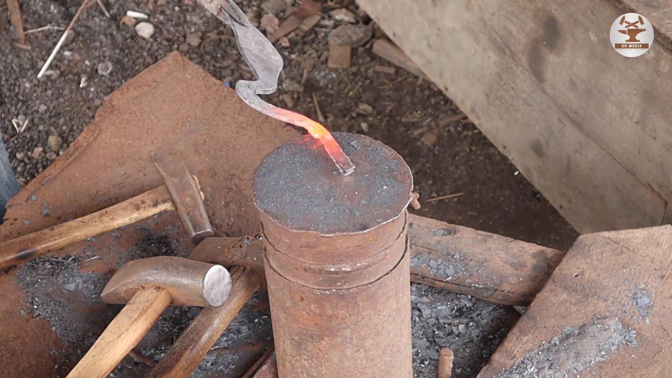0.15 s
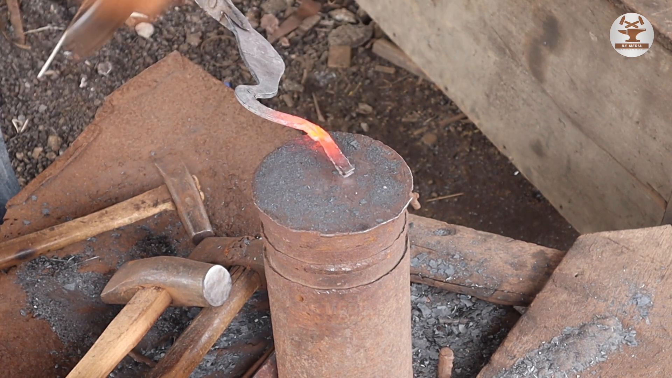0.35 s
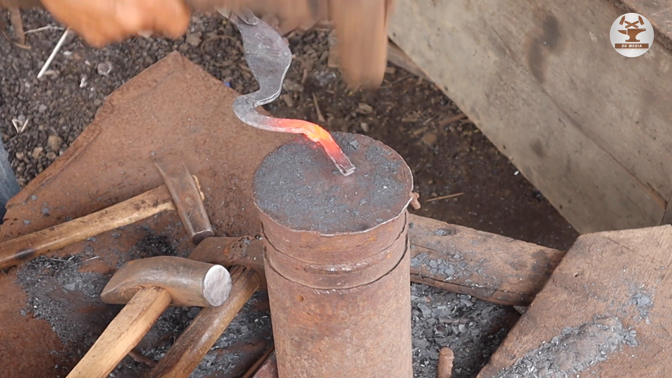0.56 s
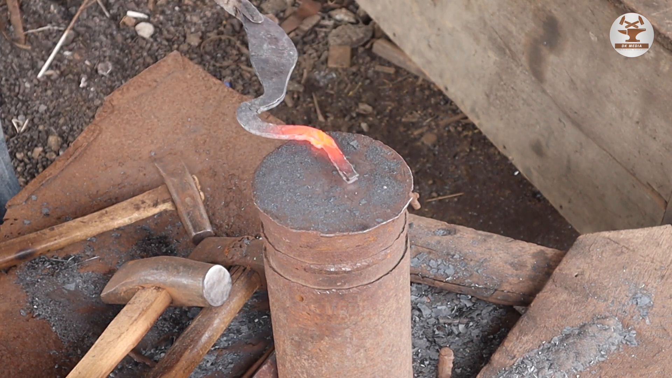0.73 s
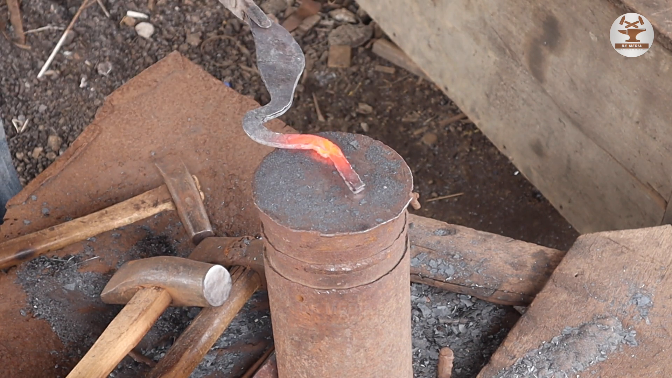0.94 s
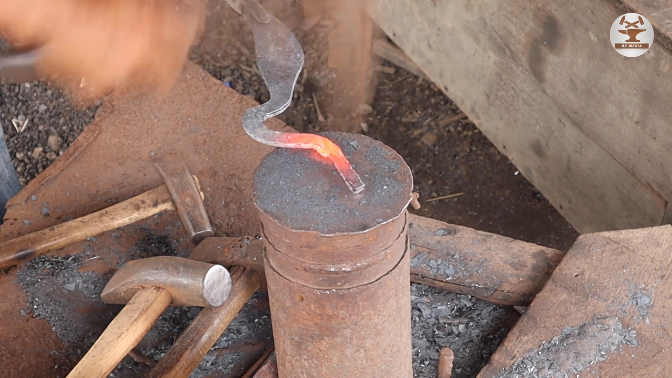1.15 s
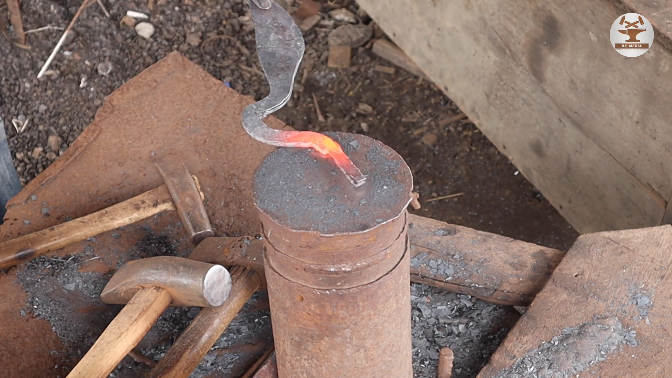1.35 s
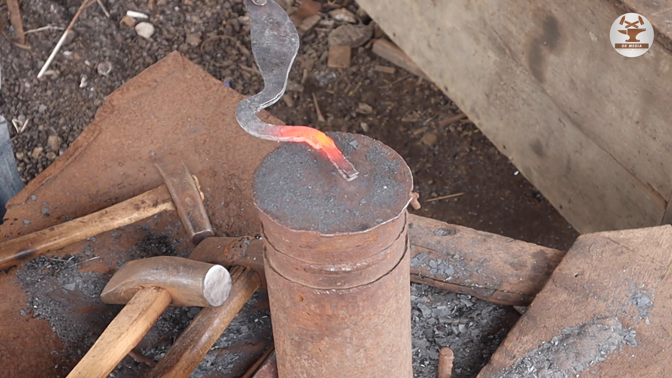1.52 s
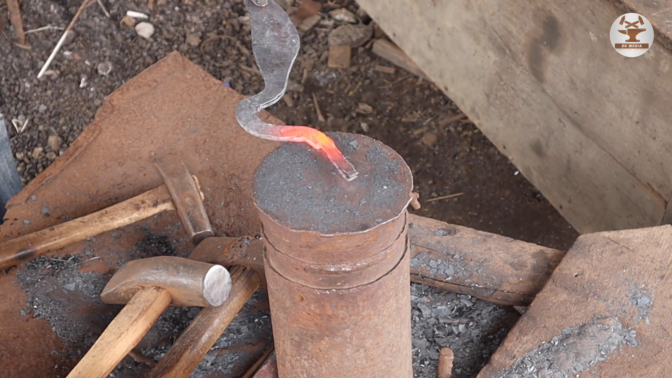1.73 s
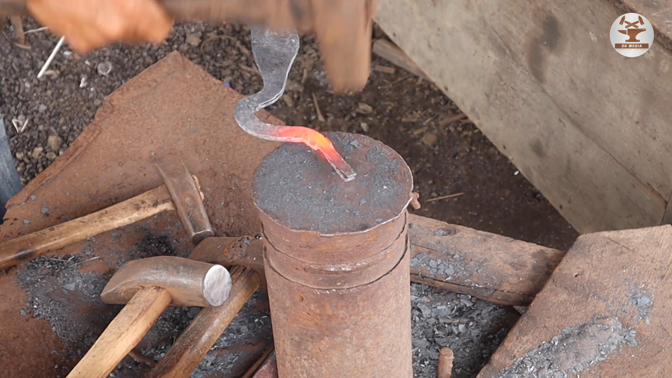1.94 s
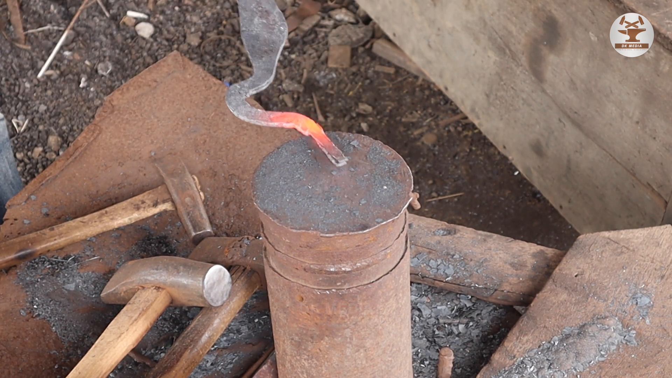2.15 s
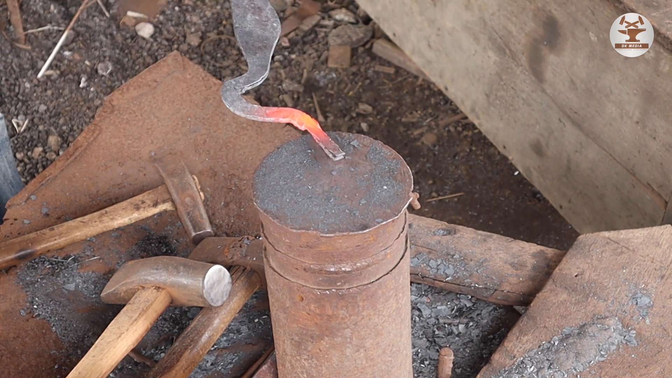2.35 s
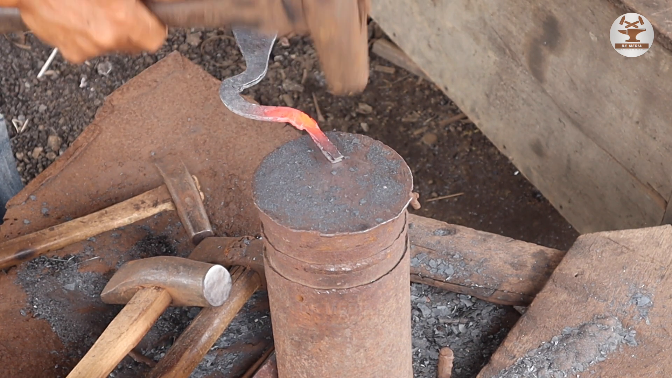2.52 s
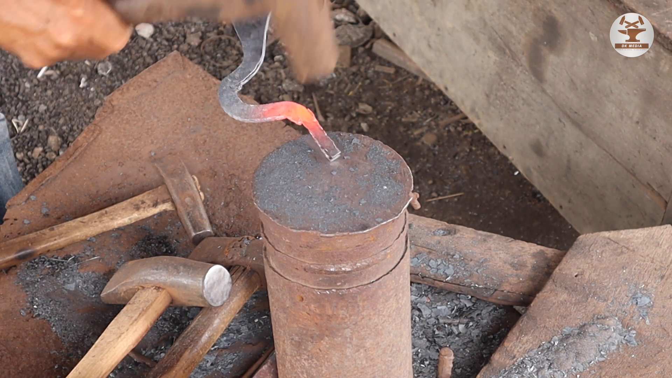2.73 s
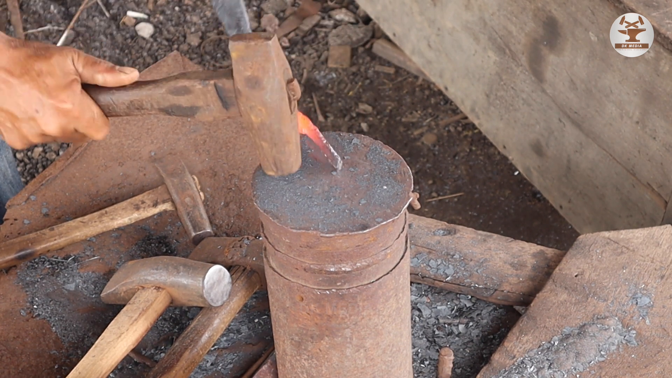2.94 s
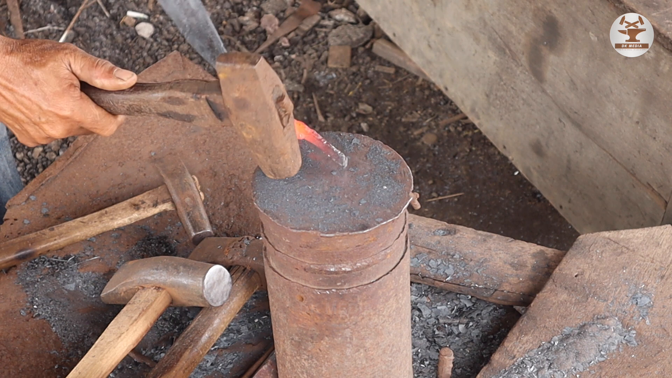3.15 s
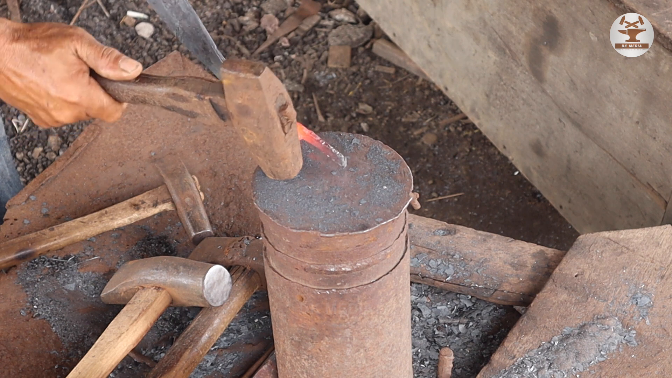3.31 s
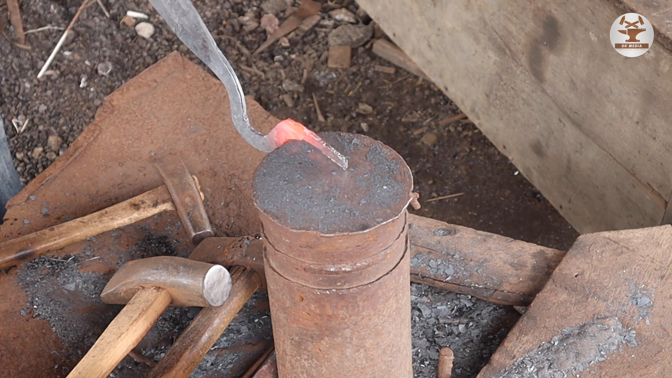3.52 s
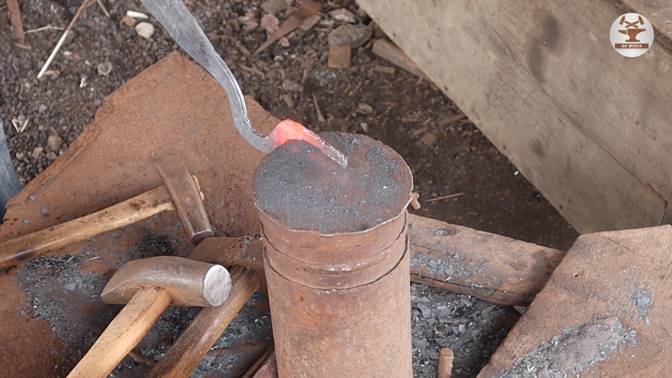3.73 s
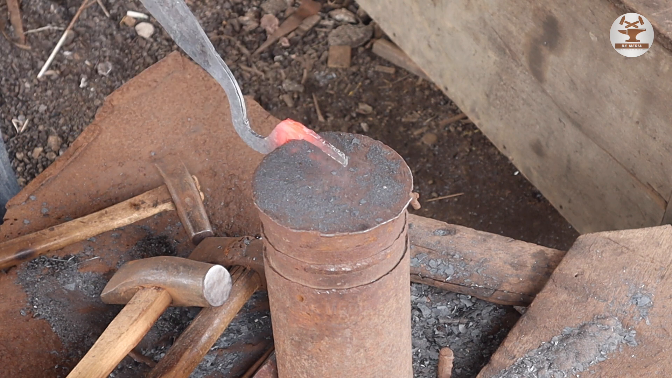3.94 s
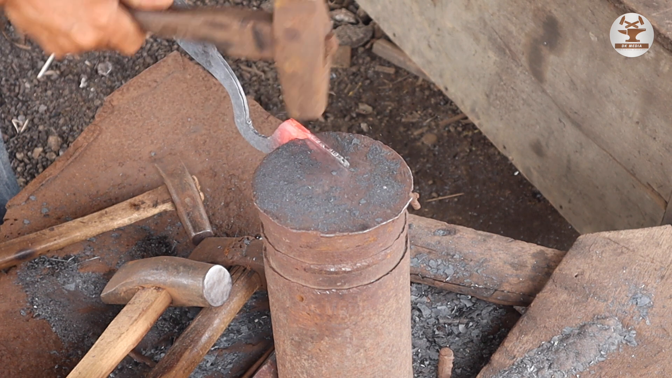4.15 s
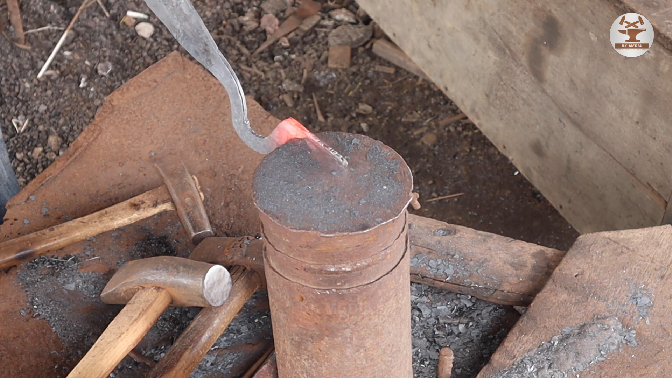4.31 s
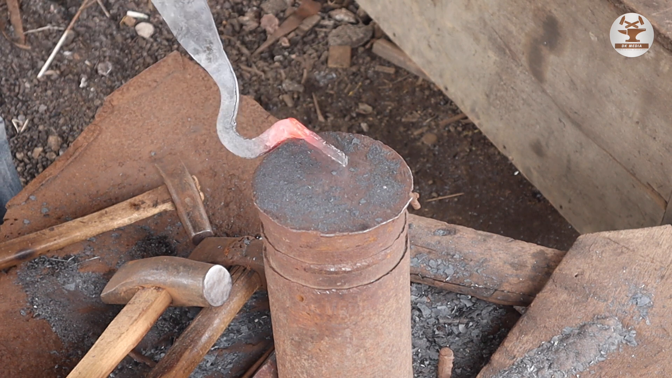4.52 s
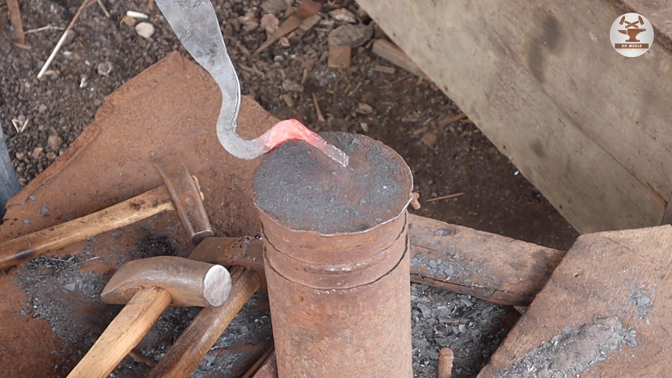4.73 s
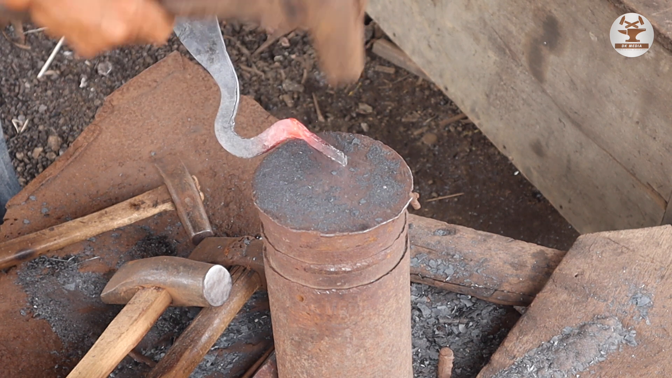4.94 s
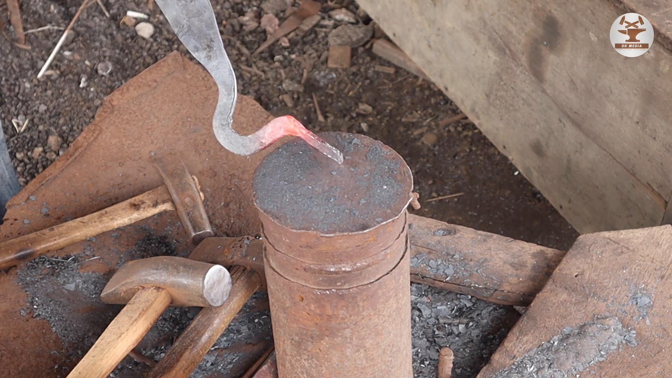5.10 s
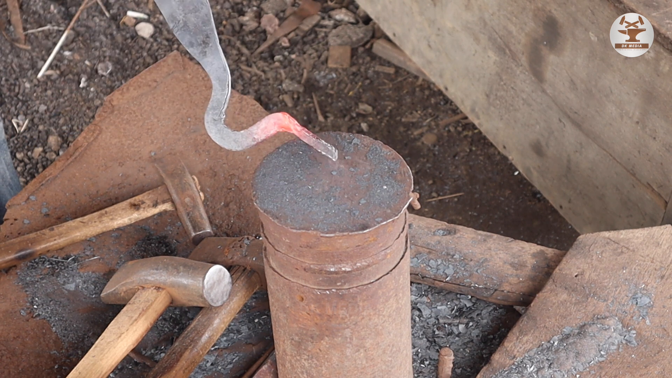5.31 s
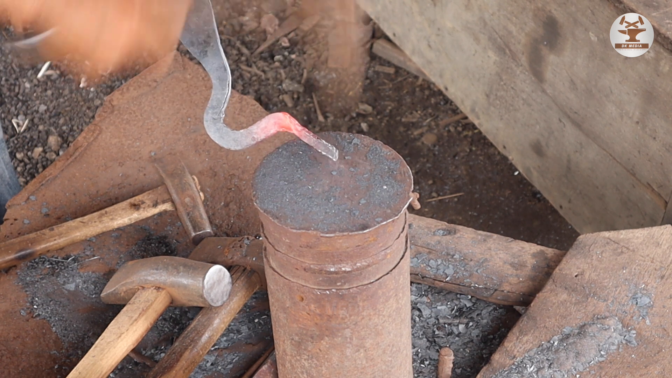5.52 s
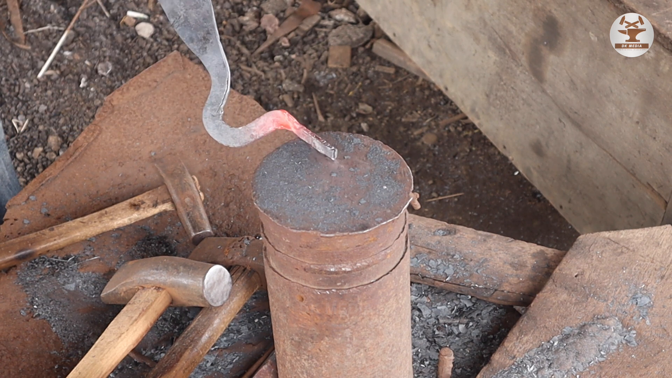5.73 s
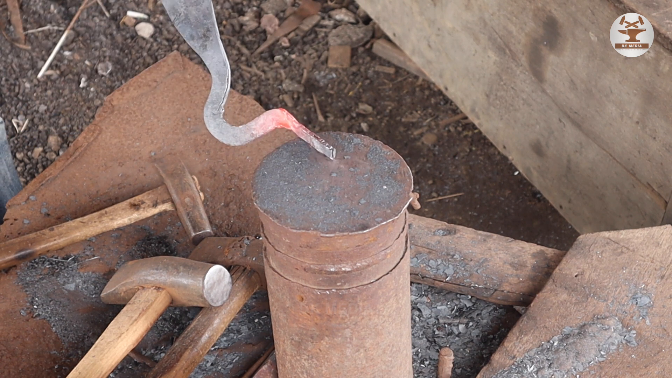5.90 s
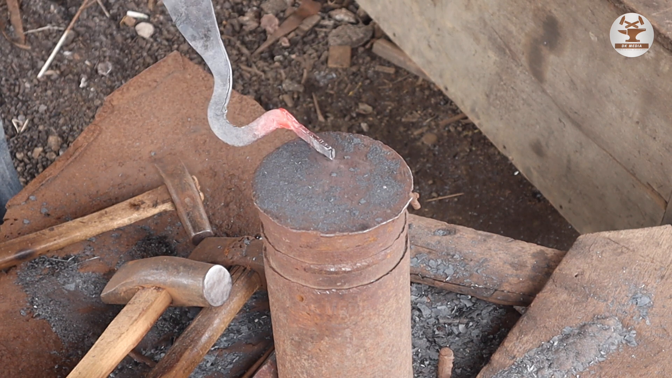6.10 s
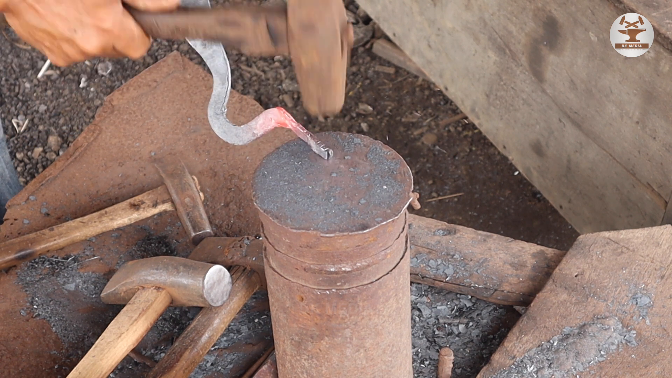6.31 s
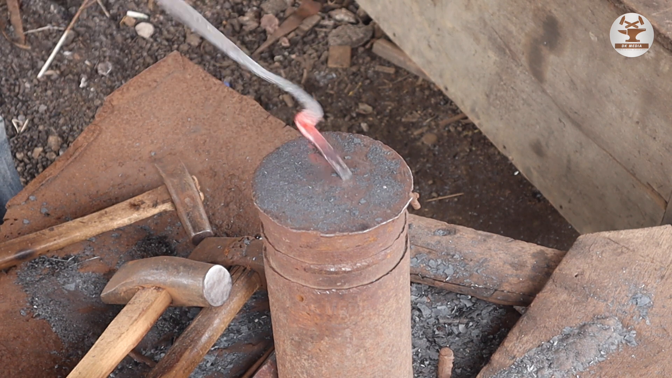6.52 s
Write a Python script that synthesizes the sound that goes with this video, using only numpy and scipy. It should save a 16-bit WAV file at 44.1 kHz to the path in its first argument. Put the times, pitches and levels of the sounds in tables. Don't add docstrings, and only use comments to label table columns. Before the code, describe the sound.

A hand hammer cracks and clanks against hot steel on a dull post anvil, close up, with a dove and rooster far behind.

```python
import sys
import numpy as np
from scipy import signal
from scipy.fft import rfft, irfft
from scipy.io import wavfile
from scipy.ndimage import uniform_filter1d

SR = 44100
rng = np.random.default_rng(int(sys.argv[2]) if len(sys.argv) > 2 else 0)


def amplitude_ratio(level_db):
    exponent = np.asarray(level_db, float) / 20
    return 10 ** exponent


def materialize(psi):
    bounded = np.clip(np.atleast_2d(psi).T, -1, 1)
    quanta = np.round(bounded * 32767).astype(np.int16)
    wavfile.write(sys.argv[1], SR, quanta)


N = 293706
LEAD = 22050

# start_s, force_db, bare_steel (0-1),
# dead_drive into the post (0-1), glance off the rim (0-1)
BLOWS = [(-.17, -16, 1, 0, 0), (.468, -15, .45, .35, .55), (1.195, -13, .6, .05, .05),
         (1.890, -15, .95, .01, .01), (2.4915, -16, 1.05, .01, .01), (2.905, -23, .9, .1, .8),
         (2.9663, -30, .9, .05, 1.2), (4.100, -19, .3, 1.05, .01), (4.104, -18, .15, .8, .01),
         (4.8974, -11, .15, .05, .1), (5.5698, -11, .1, .1, .05), (6.2372, -11, .01, .01, .05),
         (6.6205, -52, .1, 1.1, .2), (6.6265, -53, .1, 1.1, .4)]


def decay(t, t60):
    return (t >= 0) * amplitude_ratio(-60 * np.maximum(t, 0) / t60)


def ring(t, hz, t60, db=0, lag=0):
    return -amplitude_ratio(db) * decay(t - lag, t60) * np.sin(2 * np.pi * hz * (t - lag))


def band(x, lo_hz, hi_hz):
    sos = signal.butter(2, [lo_hz, min(hi_hz, SR * .49)], "band", fs=SR, output="sos")
    y = signal.sosfilt(sos, x)
    return y / np.std(y)


def walk(rate):
    k = int(SR / rate)
    steps = np.repeat(rng.standard_normal(N // k + 1), k)
    return 1.3 * uniform_filter1d(uniform_filter1d(steps, k), k)[:N]


def answer(law, blow):
    return amplitude_ratio(blow[1] + law[0] + np.dot(law[1:], blow[2:]))


def open_air():
    # pitch_hz, level_db (per Hz)
    air_curve = [(20, -5), (55, 8.5), (150, 5), (400, -2.5), (1000, -9), (2200, -15), (13000, -18.5),
                 (16000, -21)]
    hz, db = np.transpose(air_curve)
    f = np.arange(N // 2 + 1) * SR / N + 1
    tilt = amplitude_ratio(np.interp(np.log(f), np.log(hz), db))
    air = irfft(rfft(rng.standard_normal(N)) * tilt, N)
    return amplitude_ratio(-72.5 + .4 * walk(2.5)) * air / np.std(air)


def ground_rumble():
    # low_hz, high_hz, level_db
    rumble_bands = [(62, 88, 0), (160, 270, -6.5), (270, 430, -7), (600, 1000, -16)]
    t = np.arange(N) / SR
    shaken = amplitude_ratio(-88)
    for blow in BLOWS:
        shaken = shaken + answer((-55.5, 5, 8, .5), blow) * decay(t - blow[0], 2.8)
    rumble = np.zeros(N)
    for lo, hi, db in rumble_bands:
        rumble += amplitude_ratio(db + 1.5 * walk(12)) * band(rng.standard_normal(N), lo, hi)
    return shaken * rumble


def engine():
    swell_s, width_s, swell_db = 3.45, .45, 7
    t = np.arange(N) / SR
    level_db = -82 + swell_db * np.exp(-((t - swell_s) / width_s) ** 2)
    return amplitude_ratio(level_db) * band(rng.standard_normal(N), 134, 143)


def whistle(rows, tones, early=.7, rise_s=None, accent_db=0):
    out = np.zeros(N + SR)
    for s, length, start_hz, top_hz, end_hz, db in rows:
        u = np.linspace(0, 1, int(length * SR))
        knee = min(rise_s / length, .9) if rise_s else .3
        rise = start_hz + (top_hz - start_hz) * np.sin(u / knee * np.pi / 2) ** 3
        fall = top_hz - (top_hz - end_hz) * ((u - knee) / (1 - knee)) ** 2
        phase = 2 * np.pi * np.cumsum(np.where(u < knee, rise, fall)) / SR
        voice = sum(amplitude_ratio(g) * np.sin(k * phase) for k, g in tones)
        breath = np.sin(np.pi * u ** early) ** .4
        level = amplitude_ratio(db + accent_db * np.exp(-(u / knee) ** 2))
        out[int(s * SR):][:len(u)] += level * breath * voice
    return out[:N] * amplitude_ratio(1.5 * walk(60))


def dove():
    # start_s (from the first long note), length_s, level_db
    phrase = [
        (-.25, .03, 1.5),
        (-.153, .045, -1.5),
        (-.081, .045, -.7),
        (0, .095, 0),
        (.168, .095, 0),
    ]
    # start_s, pace (times), level_db
    coos = [
        (.955, 1.01, -71),
        (4.38, .95, -70.5),
        (6.466, .93, -70.5),
    ]
    low_hz, top_hz, sag_hz_per_s = 965, 1205, 1600
    rows = []
    for s, pace, db in coos:
        for lag, length, g in phrase:
            rows.append((s + pace * lag, length, low_hz, top_hz, top_hz - sag_hz_per_s * length, db + g))
    return whistle(rows, [(1, 0)], early=.33, rise_s=.021, accent_db=6)


def small_birds():
    # start_s, level_db
    chips = [
        (.322, -77),
        (1.095, -84),
        (4.25, -82),
        (5.05, -82),
        (5.865, -83),
    ]
    # start_s, length_s, pitch_hz, level_db
    whistles = [
        (.80, .07, 4750, -89),
        (.835, .06, 1430, -83),
        (5.14, .2, 1430, -84),
        (4.77, .04, 2450, -84),
    ]
    arch = .97
    rows = [(s, .026, 6300, 7200, 7650, db) for s, db in chips]
    rows += [(s, length, arch * hz, hz, arch * hz, db) for s, length, hz, db in whistles]
    return whistle(rows, [(1, 0)])


def chick():
    # start_s, length_s, start_hz, top_hz, end_hz, level_db
    peep = [
        (3.645, .135, 1220, 1310, 1275, -67.5),
    ]
    # multiple, level_db
    peep_tones = [(2, -16), (3, 0), (4, -19)]
    return whistle(peep, peep_tones)


def rooster():
    # start_s, pitch_hz, level_db, hoarseness (0-1)
    crow = [(5.12, 826, -90, .005), (5.17, 826, -80, .004), (5.32, 826, -81, .004), (5.38, 790, -79, .05),
            (5.8, 760, -81, .05), (6.02, 765, -76, .04), (6.1, 725, -78, .005), (6.52, 716, -80, .003),
            (6.62, 716, -88, .003)]
    # multiple, level_db
    crow_tones = [(1, 1.5), (2, 1.5), (3, -16)]
    s, hz, db, hoarse = np.transpose(crow)
    t = np.arange(N) / SR
    pitch_hz = np.interp(t, s, hz) * (1 + np.interp(t, s, hoarse) * walk(250))
    phase = 2 * np.pi * np.cumsum(pitch_hz) / SR
    level = amplitude_ratio(np.interp(t, s, db, -200, -200) + 2.0 * walk(30))
    return level * sum(amplitude_ratio(g) * np.sin(k * phase) for k, g in crow_tones)


def birds():
    calls = dove() + small_birds() + chick() + rooster()
    return calls + amplitude_ratio(-12) * np.roll(calls, 900) + amplitude_ratio(-14) * np.roll(calls, 2100)


def shed():
    # delay_s, level_db
    echoes = [(.0028, -7), (.0075, -15), (.0128, -9), (.0158, -9), (.021, -16), (.034, -20)]
    # pitch_hz, level_db, t60_s
    stand = [(371, -1, 0.2), (684, -3, 0.16), (797, -1, 0.15), (937, 0, 0.14), (1120, -10, 0.17),
             (1314, -17, 0.81), (1491, -6, 0.18), (1583, -10, 0.2), (1776, -2, 0.092), (2008, -7, 0.12),
             (2121, -14, 0.2), (2299, -14, 0.17), (2466, -12, 0.16)]
    # pitch_hz, near_db, near_t60_s, far_db, far_t60_s
    space = [(80, -58, .3, -66, 1.4), (190, -52, .2, -63, .8), (350, -48, .18, -68, .8),
             (680, -46, .125, -75, .7), (1200, -47, .14, -74, .6), (2400, -49, .13, -80, .5),
             (5120, -45.5, .105, -84, .4), (10240, -43, .11, -86, .3)]
    t = np.arange(3 * LEAD) / SR
    taps = np.zeros(len(t))
    for s, db in echoes:
        taps[int(s * SR)] = amplitude_ratio(db)
    out = signal.lfilter(*signal.butter(1, 1300, fs=SR), taps)
    build = 1 - np.exp(-(t / .006) ** 2)
    for hz, db, t60 in stand:
        out += build * ring(t + rng.uniform() / hz, hz, min(t60, .4), db - 58)
    for hz, near_db, near_t60, far_db, far_t60 in space:
        fade = amplitude_ratio(near_db) * decay(t, near_t60) + amplitude_ratio(far_db) * decay(t, far_t60)
        scatter = band(rng.standard_normal(len(t)), hz / 2 ** .5, hz * 2 ** .5)
        out += build * fade * scatter * np.sqrt(hz / SR * 20)
    return out


def post_hum(t, blow, shake):
    # pitch_hz, t60_s, level_db, lag_s
    post_modes = [(375, .21, 0, .004), (257, .5, -11.5, .006), (307, .27, -13, .005), (684, .16, -8, .003),
                  (530, .1, -5, .003), (800, .1, 1, .008)]
    return answer((-25, -9, 19, 4), blow) * shake * sum(ring(t, *mode) for mode in post_modes)


def jangle(t, blow, noise):
    # low_hz, high_hz, level_db
    jangle_bands = [(180, 320, -5), (320, 650, -2.5), (700, 1150, 1.5), (1150, 1900, -6)]
    loose = (1 - np.exp(-t / .02)) * answer((-40, 19, 7, 1.5), blow) * decay(t, .33)
    return loose * sum(amplitude_ratio(db) * band(noise, lo, hi) for lo, hi, db in jangle_bands)


def hammer_ring(t, blow, noise, shake):
    # pitch_hz, split_hz, level_db
    hammer = [(2400, 2400, -1.5), (3670, 60, -5), (6720, 110, -7), (9560, 90, -16), (10650, 80, -27)]
    hz, width, db = hammer[0]
    steel = amplitude_ratio(db) * band(noise, hz - width / 2, hz + width / 2)
    for hz, split, db in hammer[1:]:
        turn = rng.uniform(0, 2 * np.pi, 2)
        pair = np.sin(2 * np.pi * (hz - split / 2) * t + turn[0])
        pair += np.sin(2 * np.pi * (hz + split / 2) * t + turn[1])
        steel += amplitude_ratio(db) * shake * decay(t, 1.5 * 3700 / hz) * pair
    hold = amplitude_ratio(-60 * (t / .13) ** 2) + amplitude_ratio(-11) * decay(t, .6)
    return steel * hold * answer((-57, 30, .5, 2.5), blow)


def crack(t, blow, noise):
    fade = decay(t, .014)
    edge = answer((-19, 13, 5, 1.5), blow) * amplitude_ratio(9)
    snap = answer((-28, 13, 9, -12), blow) * amplitude_ratio(8)
    burst = np.zeros(len(t))
    for gain, lo, hi in ((edge, 1800, 4300), (snap, 4400, 11500)):
        burst += gain * band(band(fade * noise, lo, hi), .7 * lo, 1.3 * hi)
    return np.std(fade) * burst + answer((-25, -9, 19, 4), blow) * ring(t, 175, .05, 10, .002)


def body(t, blow):
    thud = -amplitude_ratio(blow[1])
    knock = answer((-8, -3, -10, 11), blow)
    clank = answer((-10, 14, -12, .5), blow)
    # gain, pitch_hz, t60_s, level_db, lag_s, extra_db toward the walls
    modes = [(thud, 500, .012, 9, .0008, 0), (knock, 970, .008, 14.5, .0001, 4),
             (clank, 1580, .011, 10, 0, 1), (knock, 790, .014, 9, .001, 6)]
    ahead = clank * ring(t, 2150, .009, 4, .0001)
    aside = np.zeros(len(t))
    for gain, hz, t60, db, lag, side_db in modes:
        ahead += gain * ring(t, hz, t60, db, lag)
        aside += gain * ring(t, hz, .4 * t60, db + side_db, lag)
    return signal.sosfilt(signal.butter(3, (410, 4000), "band", fs=SR, output="sos"), [ahead, aside])


def blows():
    out, t = np.zeros((2, N + 2 * LEAD)), np.arange(LEAD) / SR
    gaps = np.diff([blow[0] for blow in BLOWS], prepend=-1)
    for blow, gap in zip(BLOWS, gaps):
        noise = rng.standard_normal(LEAD)
        shake = 1 + .38 * band(noise, 15, 60)
        ahead, aside = body(t, blow)
        burst = crack(t, blow, noise)
        steel = hammer_ring(t, blow, noise, shake) + jangle(t, blow, noise)
        post = (gap > .02) * post_hum(t, blow, shake)
        start = LEAD + int((blow[0] + .001) * SR)
        out[:, start:start + LEAD] += [ahead + burst + steel + post, aside + burst]
    return out


def scene():
    ahead, aside = blows()
    echoed = signal.fftconvolve(aside, shed())[:len(ahead)]
    forge = (ahead + echoed)[LEAD:LEAD + N]
    forge = signal.sosfilt(signal.butter(2, 80, "high", fs=SR, output="sos"), forge)
    return (forge + birds() + open_air() + ground_rumble() + engine())[None]


def low_pass(x):
    return signal.sosfilt(signal.butter(12, 16870, fs=SR, output="sos"), x)


def record(dry):
    ceiling = .52
    mix = dry / (1 + np.abs(dry / ceiling) ** 6) ** (1 / 6)
    return low_pass(mix)


dry = scene()
out = record(dry)
materialize(out)
```